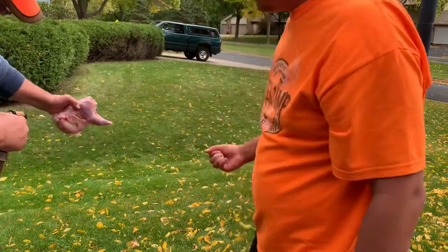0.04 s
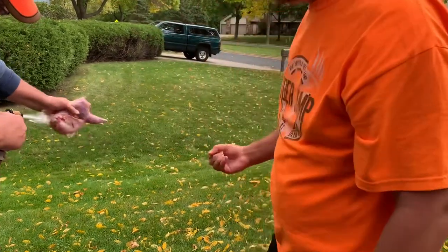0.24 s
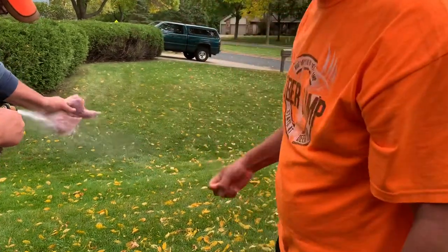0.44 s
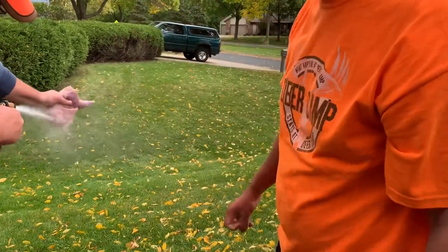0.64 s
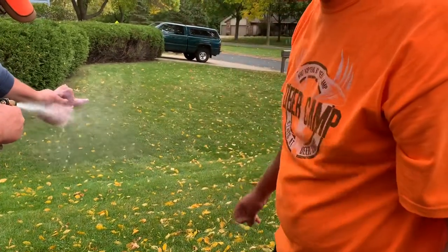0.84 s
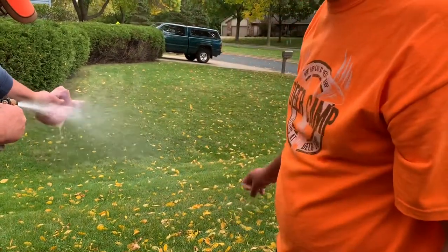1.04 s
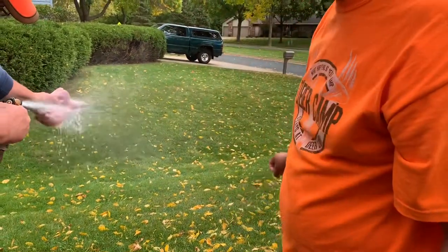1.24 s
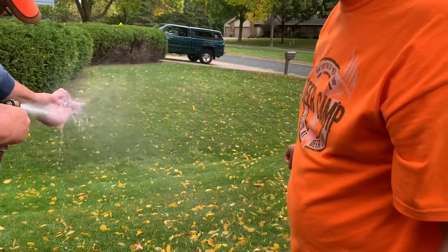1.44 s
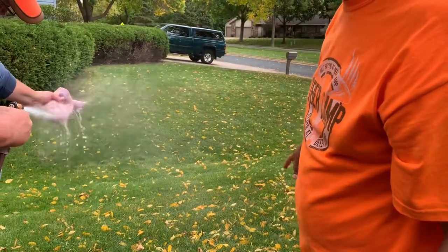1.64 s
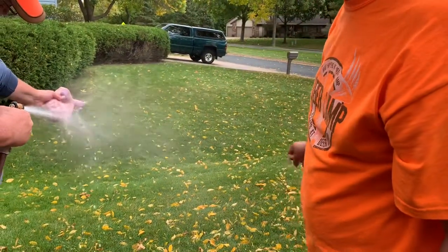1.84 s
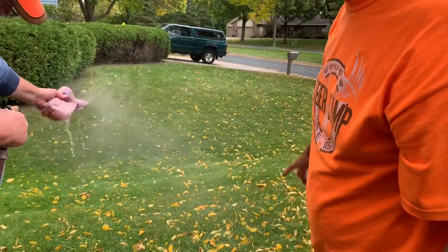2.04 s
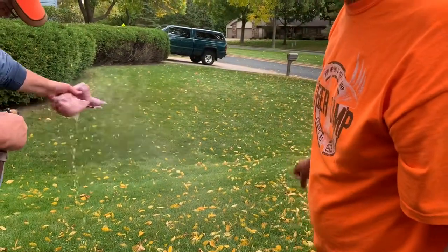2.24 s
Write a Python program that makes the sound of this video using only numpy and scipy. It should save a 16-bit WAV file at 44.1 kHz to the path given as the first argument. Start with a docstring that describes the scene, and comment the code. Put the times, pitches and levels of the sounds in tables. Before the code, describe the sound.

A garden hose sprays against a hand in one short, hissing, splattering burst outdoors.

```python
"""A distant engine hums in the street; then a garden hose, to one side of a microphone pair, spits a thin hiss.
The nozzle is squeezed open and its jet sprays against a bare hand: countless droplets crackle,
and the water splatters on the palm and rings the hollow of the hand until the valve shuts.
A puff of breeze brushes the microphones midway, and a few last drops fall on the lawn."""
import sys
import numpy as np
from scipy import signal
from scipy.fft import rfft, irfft, next_fast_len
from scipy.io import wavfile
from scipy.ndimage import map_coordinates

SR = 44100
rng = np.random.default_rng(int(sys.argv[2]) if len(sys.argv) > 2 else 0)


def int16_out(signal):
    """Quantize to a 16-bit WAV file."""
    q = np.round(np.clip(np.atleast_2d(signal).T, -1, 1) * 32767)
    wavfile.write(sys.argv[1], SR, q.astype(np.int16))


N = 101429
TIME = np.arange(N) / SR
LEAK_S, OPEN_S, SHUT_S = .1545, .2015, 1.95  # the valve cracks, opens fully, closes
MID_ONLY = np.array([[1], [0]])  # puts one signal in the mid of a mid/side pair


def amp(db):
    """Decibels to gain."""
    return 10 ** (np.asarray(db) / 20)


def unit(x):
    """Scale to rms 1."""
    return x / np.sqrt(np.mean(x ** 2) + 1e-20)


def along(points, hz):
    """(Hz, value) points read on a log axis."""
    point_hz, values = np.transpose(points)
    return np.interp(np.log(hz + 1), np.log(point_hz + 1), values)


def curves(rows):
    """One value per sample for each column after the time."""
    times, *columns = np.transpose(rows)
    return [np.interp(TIME, times, column) for column in columns]


def wobble(rate):
    """A smooth random curve, rate knots a second."""
    return map_coordinates(rng.standard_normal(int(N * rate / SR) + 4), [TIME * rate])


def filtered(x, response):
    """x times a complex response of frequency."""
    size = next_fast_len(N + SR // 2)
    return irfft(rfft(x, size) * response(np.fft.rfftfreq(size, 1 / SR)), size)[..., :N]


def equalised(x, spectrum):
    """x through a curve of (Hz, dB) points."""
    return filtered(x, lambda hz: amp(along(spectrum, hz)))


def coloured(x, spectrum):
    """x equalised, at rms 1."""
    return unit(equalised(x, spectrum))


def resonance(hz, centre_hz, width_hz):
    """Response of two like damped resonances in series."""
    return (1j * hz * width_hz / (centre_hz ** 2 - hz ** 2 + 1j * hz * width_hz)) ** 2


def swept(drive, centre_hz, width_hz):
    """drive through a resonance whose centre moves, at rms 1."""
    carrier = np.exp(2j * np.pi * np.cumsum(centre_hz) / SR)
    pole = np.exp(-np.pi * width_hz / SR)
    ring = signal.lfilter([1], np.poly([pole, pole]), drive / carrier) * carrier
    return unit(ring.real)


def stereo(pair, alike):
    """Two unrelated signals, as mid and side, mixed to a partly alike left and right."""
    turn = lambda hz: np.arccos(np.clip(along(alike, hz), -1, 1)) / 2
    mid, side = filtered(pair, lambda hz: np.array([np.cos(turn(hz)), np.sin(turn(hz))]))
    return np.array([mid + side, mid - side])


def droplets(per_s, spread_db, life_ms, mist_db):
    """Random impacts of uneven size, each a tiny burst, over a smooth mist; two signals of rms 1."""
    lands = rng.random(N) < per_s / SR
    hits = lands * amp(spread_db * np.clip(rng.standard_normal(N), -2, 2))
    power = signal.lfilter([1], [1, -np.exp(-2000 / (life_ms * SR))], hits ** 2)
    envelope = np.sqrt(power / power.mean() + amp(mist_db) ** 2)
    return unit(envelope * rng.standard_normal((2, N)))


def snaps(rows, life_ms):
    """One dying burst of noise for each (s, dB) row."""
    age = np.arange(SR // 10) / SR
    decay = np.exp(-1000 * age / life_ms)
    out = np.zeros(N + SR)
    for start_s, db in rows:
        out[round(start_s * SR):][:len(age)] += amp(db) * decay * rng.choice([-1, 1], len(age))
    return out[:N] * MID_ONLY


# Open air all around the microphones. Each row: frequency in Hz, relative level in dB.
STREET_COLOUR = [(20, -39), (38, -11), (60, 3), (85, 0), (110, -3.5), (170, -10), (300, -13), (500, -18.5),
                 (780, -14.5), (1100, -20), (2000, -30.5), (4000, -34), (9000, -46.5), (16000, -46)]
# That air across the pair. Each row: frequency in Hz, likeness of left and right from 0 to 1.
STREET_ALIKE = [(50, 0.66), (200, 0.85), (500, 0.16), (1000, 0.047), (4000, 0.089)]
# An engine far off in the street. Each row: time in seconds, pitch in Hz, level in dB of its upper tone.
ENGINE = [(0, 122.6, -50), (.4, 127.2, -50.5), (.8, 132.5, -46), (1.2, 135.7, -51), (1.65, 138.5, -51),
          (1.95, 138, -63), (2.3, 138.4, -74)]
DRONE_RATIO, DRONE_DB = .615, -53  # its lower tone

def street():
    """Outdoor rumble and a distant engine slowly gathering speed."""
    pitch_hz, level_db = curves(ENGINE)
    phase = 2 * np.pi * np.cumsum(pitch_hz * (1 + 0.0069 * wobble(11.84))) / SR
    hum = amp(level_db + 1.37 * wobble(7.12)) * np.sin(phase)
    drone = amp(DRONE_DB + 0.74 * wobble(7.2)) * np.sin(DRONE_RATIO * phase)
    air = stereo(coloured(rng.standard_normal((2, N)), STREET_COLOUR), STREET_ALIKE)
    return np.sqrt(2) * (hum + drone) + amp(-46.5) * air


def breeze(peak_s=0.98, swell_s=0.15, level_db=-44):
    """A soft puff of air rumbles right at the microphones."""
    colour = [(15, -30), (35, -5), (60, -2), (90, -12), (200, -35), (1000, -90)]
    rumble = stereo(coloured(rng.standard_normal((2, N)), colour), STREET_ALIKE)
    return rumble * amp(level_db) * np.exp(-((TIME - peak_s) / swell_s) ** 2)


def settling():
    """The mist patters down on grass and leaves after the valve has shut."""
    colour = [(500, -16), (2000, -16), (5000, -3.5), (8000, -1), (10500, 2), (16000, 2)]
    patter = coloured(droplets(per_s=370, spread_db=10, life_ms=.6, mist_db=0), colour)
    age = np.maximum(TIME - SHUT_S, 0)
    return patter * (TIME > SHUT_S) * (amp(-62 - 10 * age) + amp(-50.5 - 114 * age))


def leak(level_db=-45.5):
    """A thin hiss leaves the nozzle just before the jet lands."""
    colour = [(200, -13), (800, -2), (2500, 2), (5000, 4), (8000, 0), (10000, 7.5), (12000, -1),
              (16000, -4)]
    thin = coloured(droplets(per_s=750, spread_db=6, life_ms=0.43, mist_db=7), colour)
    spurt_db = 5 * np.exp(-np.abs(TIME - LEAK_S) / 0.0035)
    return thin * (TIME > LEAK_S) * (TIME < OPEN_S) * amp(level_db + spurt_db)


# The jet shoving the hand. Each row: start in seconds, relative level in dB.
THUDS = [(.356, -33.5), (1.331, -32.5)]

def thuds():
    """Soft low blows of the jet on the flesh of the hand."""
    dull = [(60, -5), (160, 15), (350, 14), (600, 7.5), (2000, -25)]
    return equalised(snaps(THUDS, life_ms=11.5), dull)


# The ring inside the cupped hand. Each row: time in seconds, relative level in dB.
HOLLOW_LEVEL = [(0.21, -46), (0.234, -40.5), (0.258, -55), (0.392, -46), (0.73, -48.5), (0.8, -40.5),
                (0.852, -47.5), (0.97, -42), (1.064, -42), (1.13, -42.5), (1.18, -48.5), (1.24, -43),
                (1.37, -42), (1.45, -46.5), (1.56, -48.5), (1.62, -57), (1.928, -55.5), (1.945, -70)]

def hollow(centre_hz=799, width_hz=178):
    """The jet rings the air in the cupped hand unevenly."""
    level_db, = curves(HOLLOW_LEVEL)
    drive = droplets(per_s=600, spread_db=1, life_ms=0.65, mist_db=0)
    ring = unit(filtered(drive, lambda hz: resonance(hz, centre_hz, width_hz)))
    return ring * amp(level_db + 2 + 0.6 * wobble(35.1))


# Notes from the same hollow. Each row: time of the peak in seconds, pitch in Hz, level in dB at the hand.
GULPS = [(.806, 814, -33), (1.011, 781, -29), (1.111, 840, -29), (1.233, 788, -29.5), (1.266, 841, -31),
         (1.315, 799, -31.5), (1.339, 789, -31)]

def gulps(swell_s=0.008):
    """Single strong gulps: the hollow swells to a clear note and dies again."""
    out = np.zeros(N)
    for peak_s, hz, db in GULPS:
        phase = 2 * np.pi * (rng.random() + np.cumsum(hz * (1 + 0.01502 * wobble(120))) / SR)
        out += amp(db) * np.exp(-((TIME - peak_s) / swell_s) ** 2) * np.sin(phase)
    return out * MID_ONLY


# Surges off the palm. Each row: peak time and length in seconds, pitch in Hz, level in dB at the hand.
SPLASHES = [(0.315, 0.015, 1610, -37.5), (0.803, 0.013, 1780, -32), (.828, 0.022, 1390, -35),
            (.925, 0.042, 1760, -40), (0.968, 0.057, 1700, -37), (0.998, .018, 1500, -39.5),
            (1.334, 0.042, 1306, -37.5), (1.564, 0.03, 1360, -39), (1.856, 0.025, 1622, -41),
            (1.888, 0.027, 1400, -37)]

def splashes(fall_octaves=0.023, width_ratio=0.28):
    """Surges of water ring short-lived pockets of air on the palm; the pitch slides as each one opens."""
    out = np.zeros((2, N))
    for peak_s, length_s, hz, db in SPLASHES:
        lengths = np.clip((TIME - peak_s) / length_s, -3, 3)
        grains = droplets(per_s=1400, spread_db=2, life_ms=1, mist_db=2)
        pocket = swept(grains, hz * 2 ** (-fall_octaves * lengths), width_ratio * hz)
        out += amp(db) * np.exp(-2 * lengths ** 2) * pocket
    return out


# Bright splats. Each row: start in seconds, length in seconds, level in dB at the hand.
SPLATS = [(.508, 0.013, -30), (1.315, 0.026, -38), (1.549, 0.041, -35.5), (1.839, 0.028, -36.5),
          (1.888, .026, -37)]

def splats(attack_s=.002):
    """A sheet of water breaks on the hand in a quick, bright rattle."""
    gain = np.zeros(N)
    for start_s, length_s, db in SPLATS:
        age = np.maximum(TIME - start_s, 0)
        gain += amp(db) * (1 - np.exp(-age / attack_s)) * np.exp(-(age / length_s) ** 4)
    colour = [(600, -19), (1500, -5), (2200, -8.5), (3200, 2), (4000, 0), (4700, 4.5), (6000, -15),
              (9000, -36)]
    return gain * coloured(droplets(per_s=800, spread_db=1, life_ms=.5, mist_db=2), colour)


# Spatter off the fingers. Each row: time in seconds, relative level in dB.
SPATTER_LEVEL = [(.21, -42), (.28, -50.5), (.32, -44), (.7, -43.5), (1.05, -42.5), (1.17, -49), (1.33, -47),
                 (1.45, -51.5), (1.566, -49), (1.68, -53), (1.81, -53), (1.86, -42.5), (1.945, -51)]
# Resonances between the fingers. Each row: centre in Hz, width in Hz, gain in dB.
FINGER_MODES = [(2466, 330, -3), (3090, 200, -5), (3992, 280, -5), (4490, 180, -1.5)]

def finger_spatter():
    """Coarse drops rattle in the midrange; their pitch wanders as the jet moves over the fingers."""
    level_db, = curves(SPATTER_LEVEL)
    out = np.zeros((2, N))
    for hz, width_hz, db in FINGER_MODES:
        grains = droplets(per_s=450, spread_db=4, life_ms=0.46, mist_db=-5)
        gain = amp(db + 2.05 * wobble(28))
        out += gain * swept(grains, hz * (1 + 0.026 * wobble(12)), width_hz)
    return out * amp(level_db)


# The slap on the palm and the sizzle off it. Each row: time in seconds, relative level in dB.
SLAP_LEVEL = [(0.21, -49), (0.296, -45), (0.518, -46), (0.562, -50.5), (0.682, -42.5), (0.785, -48),
              (0.804, -46.5), (0.87, -44), (0.904, -43), (1.194, -48), (1.344, -46.5), (1.392, -49.5),
              (1.522, -52), (1.562, -45.5), (1.654, -57), (1.812, -51.5), (1.88, -43.5), (1.945, -54)]
SIZZLE_LEVEL = [(0.21, -32), (0.272, -40.5), (0.446, -38), (0.77, -40.5), (0.904, -36), (1.252, -47),
                (1.348, -35.5), (1.498, -44.5), (1.566, -32.5), (1.596, -41), (1.62, -33.5), (1.668, -50),
                (1.774, -37), (1.808, -48), (1.842, -36), (1.876, -36.5), (1.89, -34), (1.945, -47)]
# Their tone at the hand. Each row: frequency in Hz, relative level in dB.
SLAP_COLOUR = [(80, -17), (180, -12.5), (350, -0.5), (520, -5.5), (1050, -1.5), (1400, 0.5), (2150, 3),
               (3000, -8.5), (6000, -25)]
SIZZLE_COLOUR = [(500, -28), (2000, -33.5), (3000, -8), (3700, -4), (4500, 1), (5600, 2), (7000, 1.5),
                 (10000, -11), (16000, -28)]
# Resonances of the wet palm. Each row: centre in Hz, width in Hz, relative gain in dB.
PALM_MODES = [(1317, 196, -3), (1486, 160, -0.5), (1781, 200, 0)]

def palm_splatter():
    """Coarse water slaps and gurgles on the palm and sizzles off it."""
    slap_db, = curves(SLAP_LEVEL)
    sizzle_db, = curves(SIZZLE_LEVEL)
    grains = droplets(per_s=1100, spread_db=3.5, life_ms=0.48, mist_db=0)
    palm = lambda hz: sum(amp(db) * resonance(hz, centre, width) for centre, width, db in PALM_MODES)
    gurgle = unit(filtered(grains, palm))
    slap = coloured(grains[::-1], SLAP_COLOUR)  # pair swapped: same impacts, unrelated noise
    body = (slap + gurgle) * amp(slap_db + 1.5 + 1.74 * wobble(59.84))
    sizzle = coloured(grains, SIZZLE_COLOUR) * amp(sizzle_db + 3.5 + 1.34 * wobble(48.8))
    return body + sizzle


# Slugs on the hand, then drips on the lawn. Each row: start in seconds, relative level in dB.
SLUGS = [(.2017, -13), (.2058, -20), (.2083, -23), (.2110, -19), (.2187, -14), (.2251, -17), (.2398, -21),
         (.9739, -17), (1.3959, -12), (1.5155, -24), (1.6527, -18), (1.6797, -32), (1.7566, -12),
         (1.7765, -19), (1.8505, -14)]
DRIPS = [(2.022, -45), (2.029, -33.5)]

def slugs_and_drips():
    """Single slugs of water smack sharply; the last drips land more softly."""
    smacks = snaps(SLUGS, life_ms=0.16)
    drips = amp(-11.5) * snaps(DRIPS, life_ms=1.2)
    bright = [(300, -22), (2500, -22), (4200, -1), (6500, 7.5), (10000, 10), (16000, 11)]
    return equalised(smacks + drips, bright)


# The spray on the skin, the loudest layer. Each row: time in seconds, relative level in dB.
HISS_LEVEL = [(0.21, -25), (0.258, -29.5), (0.34, -27), (0.746, -24), (0.778, -30.5), (0.794, -26),
              (1.068, -26.5), (1.146, -31.5), (1.204, -33.5), (1.214, -29), (1.31, -30), (1.382, -25.5),
              (1.498, -27.5), (1.508, -25), (1.596, -28), (1.61, -24.5), (1.778, -25), (1.808, -29),
              (1.852, -25), (1.914, -29.5), (1.938, -23.5), (1.945, -34.5)]
# Its tone at the hand. Each row: frequency in Hz, relative level in dB.
HISS_COLOUR = [(200, -29), (1000, -45), (2500, -24.5), (4000, -14.5), (5500, -12.5), (6600, -2.5),
               (7500, -5.5), (8300, -4), (9300, 3), (10400, 2), (11600, -1.5), (13400, 1.5), (16000, -3)]

def hiss():
    """Fine droplets crackle on the skin; the jet flutters."""
    level_db, = curves(HISS_LEVEL)
    grains = coloured(droplets(per_s=2400, spread_db=5.5, life_ms=0.37, mist_db=2), HISS_COLOUR)
    flutter_db = 1.4 * wobble(44.81) + 0.65 * wobble(220)
    return grains * amp(level_db + 4 + flutter_db)


def valve(fall_db_per_s=852):
    """Gain of the jet: on at once, dying quickly when the trigger is let go."""
    return (TIME >= OPEN_S) * amp(-fall_db_per_s * np.maximum(TIME - SHUT_S, 0))


# The water across the pair. Each row: frequency in Hz, likeness of left and right from 0 to 1.
SPRAY_ALIKE = [(200, 0.92), (900, 0.95), (2000, 0.91), (3500, 0.26), (5000, 0.41), (6500, 1), (10000, 1),
               (16000, 1)]
# Early echoes off the arm, a body nearby and the ground. Each row: delay in milliseconds, gain.
ECHOES = [(1.9, 0.021), (4.4, 0.17), (7.3, 0.15), (11.6, 0.083), (24, 0.13)]
# The water stands off to one side. Each row: frequency in Hz, lead of the left microphone in radians.
LEFT_LEAD = [(0, 0), (1800, 2), (2150, 3.5), (2500, 4.5), (3300, 4), (3950, 6.5), (5900, 6.5),
             (16000, -6.5)]

def at_microphones(water):
    """The water reaches the pair with early echoes and a phase offset between left and right."""
    def path(hz):
        echoes = 1 + sum(gain * np.exp(-2j * np.pi * hz * ms / 1000) for ms, gain in ECHOES)
        lead = np.interp(hz, *np.transpose(LEFT_LEAD))
        return echoes * np.exp(np.outer([.5j, -.5j], lead))
    return filtered(stereo(water, SPRAY_ALIKE), path)


def scene():
    """The water off to one side of the microphones, the street all around."""
    jet = hiss() + palm_splatter() + finger_spatter() + splats() + splashes() + hollow() + gulps()
    water = valve() * jet + slugs_and_drips() + thuds() + leak() + settling()
    return at_microphones(water) + street() + breeze()


def record(dry):
    """The recorder keeps nothing above its band limit."""
    top_hz = 15850
    return filtered(dry, lambda hz: 1 / (1 + (hz / top_hz) ** 200))


dry = scene()
out = record(dry)
int16_out(out)
```